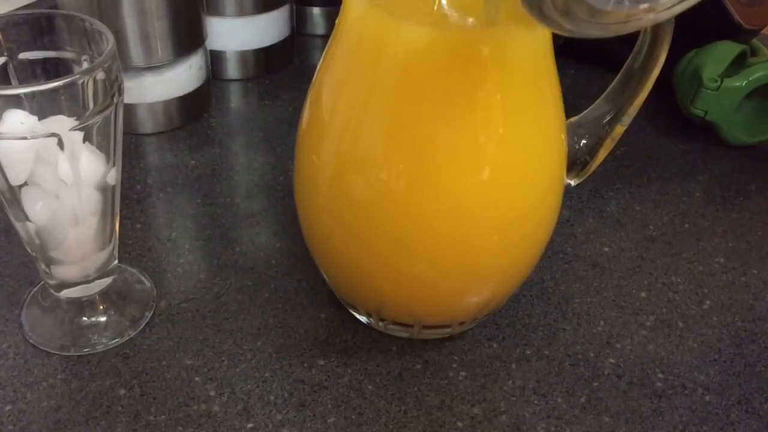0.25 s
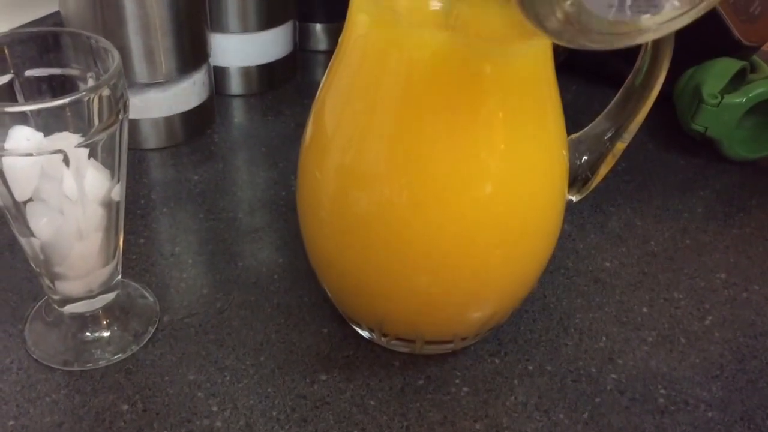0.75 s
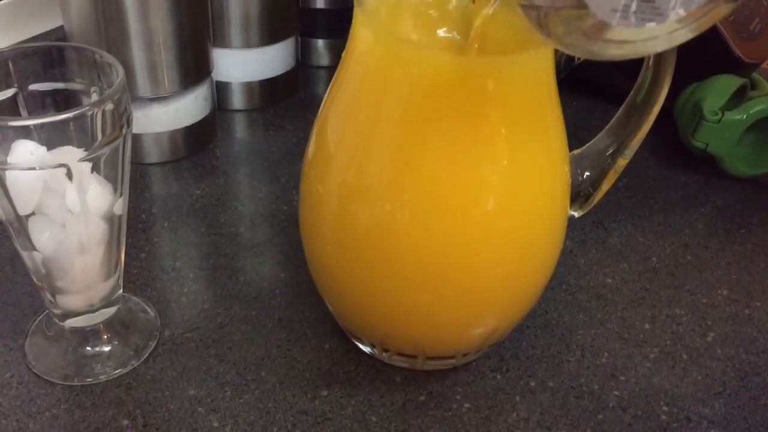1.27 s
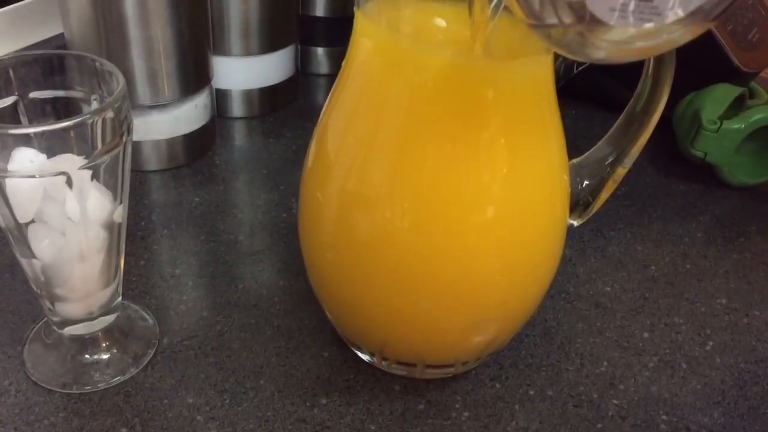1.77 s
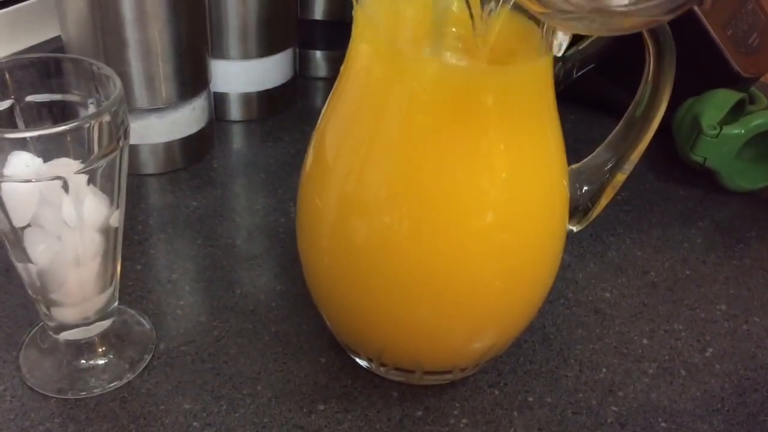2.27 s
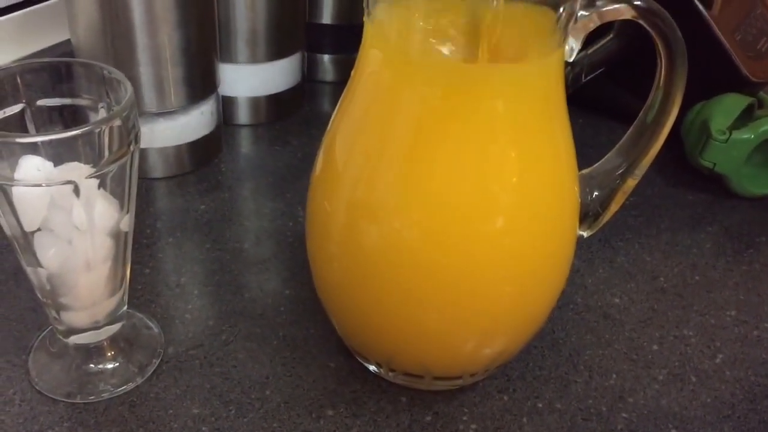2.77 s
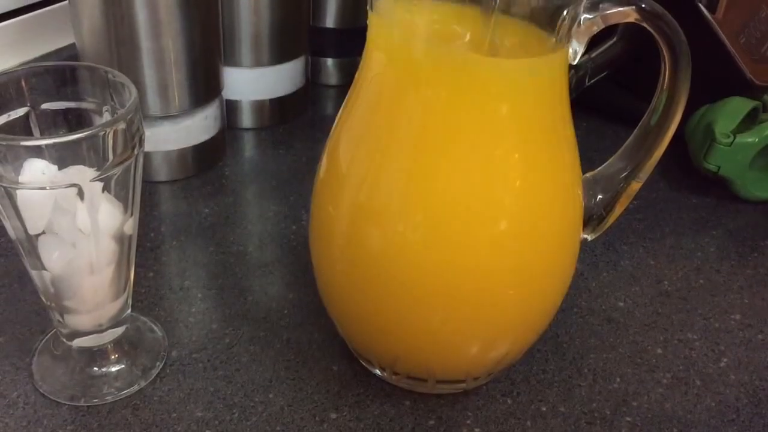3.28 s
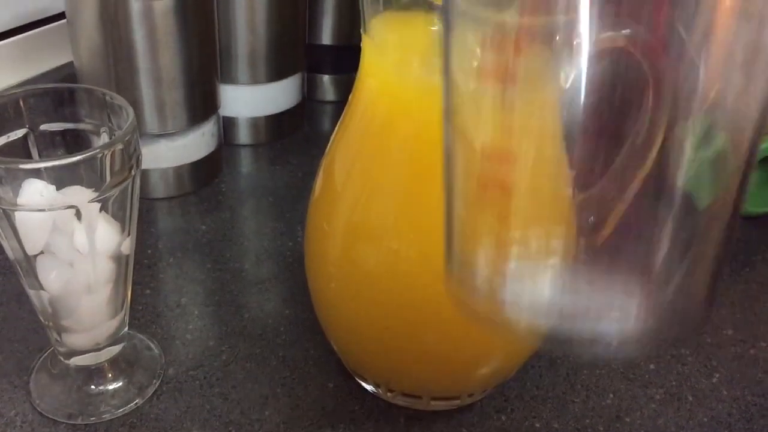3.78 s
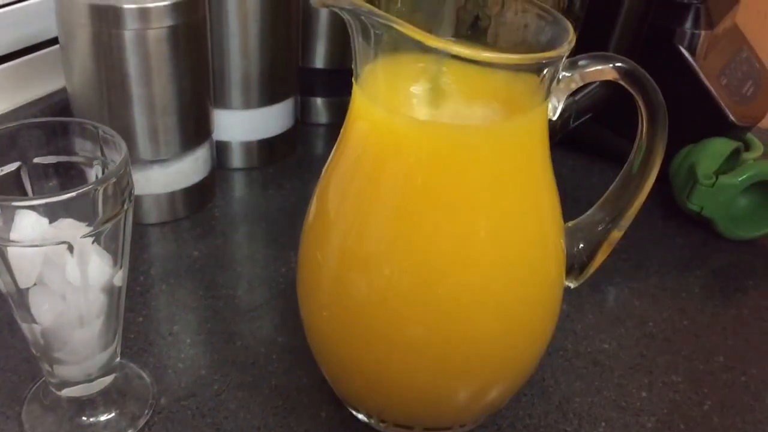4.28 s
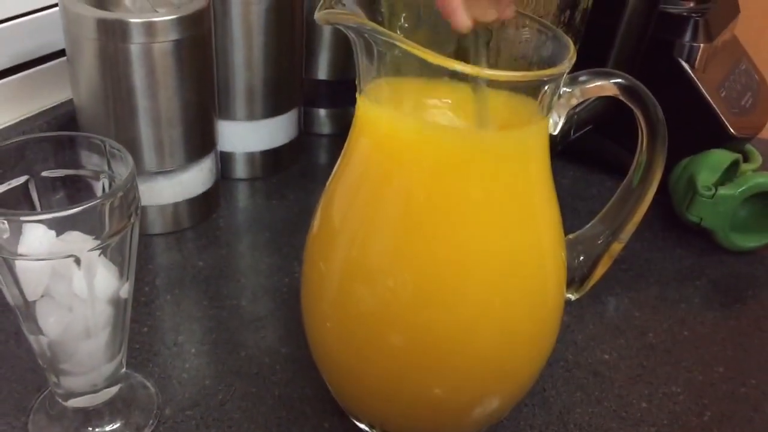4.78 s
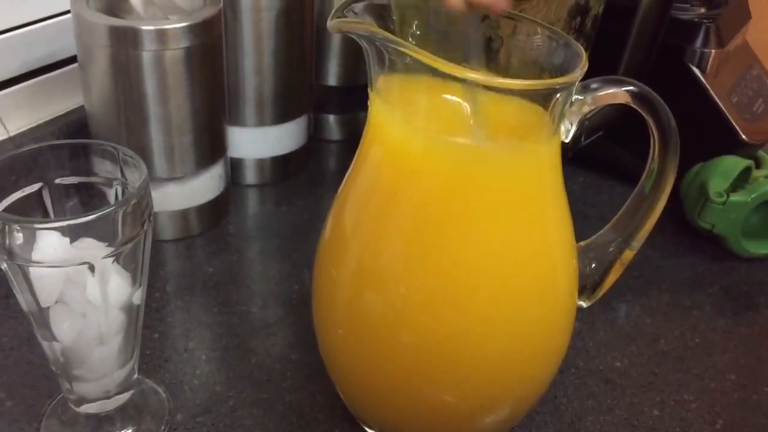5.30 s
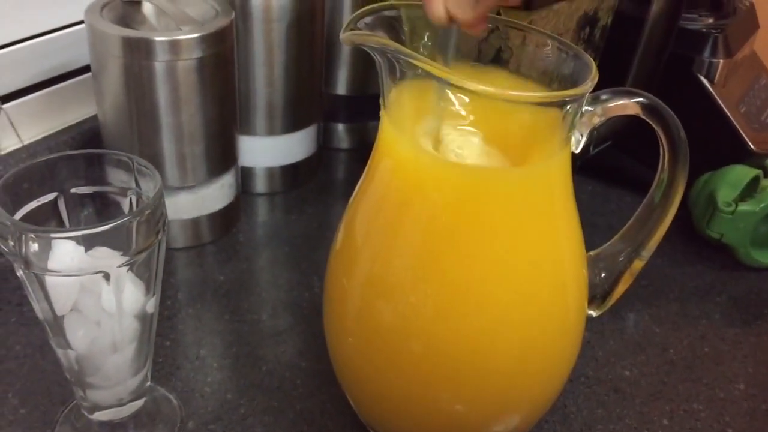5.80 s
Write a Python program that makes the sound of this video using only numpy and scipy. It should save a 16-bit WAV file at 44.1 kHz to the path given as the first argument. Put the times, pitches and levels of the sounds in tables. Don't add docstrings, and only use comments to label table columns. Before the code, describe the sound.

Quick, uneven glass clinks from a stirring spoon ride over wet swirling, bubbles and a light trickle. After about three seconds the clinking stops for a second of plastic ticks and dull bumps. It starts again, and a hard hollow plastic clack, by far the loudest sound, hits close to the microphone, followed by gritty scrapes. Small kitchen, single close microphone, low rumble and soft hiss.

```python
import sys
import numpy as np
from scipy import signal
from scipy.fft import rfft, irfft
from scipy.io import wavfile
from scipy.ndimage import uniform_filter1d

SR = 44100
rng = np.random.default_rng(int(sys.argv[2]) if len(sys.argv) > 2 else 0)


def level_to_linear(level):
    exponent = np.asarray(level, float) / 20
    return 10 ** exponent


def bounce(signal):
    frames = np.transpose(np.atleast_2d(signal))
    limited = np.clip(frames, -1, 1)
    pcm = np.round(limited * 32767).astype(np.int16)
    wavfile.write(sys.argv[1], SR, pcm)


N = 266805
FULL_S = 3.3


def evened(x):
    return x / np.sqrt(np.mean(x ** 2) + 1e-20)


def read(points, hz):
    f, value = np.transpose(points)
    return np.interp(np.log(hz + 1), np.log(f + 1), value)


def curve(rows):
    s, db = np.transpose(rows)
    return level_to_linear(np.interp(np.arange(N) / SR, s, db, left=-120, right=-120))


def add(mix, s, sound):
    part = mix[round(s * SR):][:len(sound)]
    part += sound[:len(part)]


def smoothed_noise(size):
    return evened(uniform_filter1d(rng.standard_normal(N), size=size))


def shaped(spectrum):
    hz = np.fft.rfftfreq(N, 1 / SR)
    return evened(irfft(rfft(rng.standard_normal(N)) * level_to_linear(read(spectrum, hz)), N))


def coloured(spectrum, patchy_db):
    frames, hz = N // 128 + 5, np.fft.rfftfreq(512, 1 / SR)
    a, b, patches = rng.standard_normal((frames, 257, 3)).T
    patches = uniform_filter1d(patches, size=5, axis=0)
    patches = evened(uniform_filter1d(patches, size=8, axis=1))
    z = (a + 1j * b) * level_to_linear(read(spectrum, hz)[:, None] + patchy_db * patches)
    return evened(signal.istft(z, nperseg=512, noverlap=384)[1][:N])


def resonate(x, hz, width):
    r = np.exp(-np.pi * width / SR)
    turn = np.exp(2j * np.pi * min(hz, SR / 2.2) / SR)
    return 2 * signal.lfilter([1 - r], [1, -r * turn], x).real


def swells(events, rise_s, fall_s):
    out, t = np.zeros(N), np.arange(SR // 2) / SR
    hump = (1 - np.exp(-t / rise_s)) ** 2 * np.exp(-t / fall_s)
    for s, db in events:
        add(out, s, level_to_linear(db) * hump / hump.max())
    return out


def crowd(spectrum, level_db, width, count=100):
    hz = np.geomspace(260, 15000, count) * (1 + .03 * rng.standard_normal(count))
    widths = width * (hz / 1000) ** .45
    db = level_db + read(spectrum, hz) + 10 * np.log10(hz / 1000 * widths / width)
    return np.transpose([hz, widths, db])


def struck(modes, edges_hz, groups_db, damping, spread_db, bounce_s, bounce_db, swell, skitter_db, lag_s):
    t = np.float32(np.arange(3000) / SR)
    hz, width, db = np.float32(np.transpose(modes)[:, :, None])
    level_luck, pitch_luck, phase_luck = np.float32(rng.standard_normal((3, len(modes), 1)))
    rings = level_to_linear(db + spread_db * level_luck) * np.exp(-np.pi * damping * width * t)
    rings = rings * np.sin(2 * np.pi * hz * (1 + .008 * pitch_luck) * t + 2 * phase_luck)
    rings[:, :500] *= (1 - np.exp(-t[:500] * np.sqrt(hz * 1000) / swell)) ** 2
    contact = level_to_linear(bounce_db) * rng.standard_normal(len(t)) * np.exp(-t / bounce_s)
    skitter = 9 * rng.uniform(-1, 1, len(t)) * (rng.random(len(t)) < 700 / SR)
    contact += level_to_linear(skitter_db) * uniform_filter1d(skitter, size=9) * np.exp(-t / .024)
    contact[0] = 1
    group, out = np.digitize(hz[:, 0], edges_hz), np.zeros(len(t))
    for k, group_db in enumerate(groups_db):
        part = signal.oaconvolve(rings[group == k].sum(axis=0), contact)[:len(t)]
        late_s = lag_s if k < len(edges_hz) else 0
        add(out, late_s, level_to_linear(group_db) * part / abs(part).max())
    return out * signal.windows.tukey(2 * len(t), .7)[len(t):]


def crackles(table):
    out, t = np.zeros(N), np.arange(4000) / SR
    for s, db, hz, t60_s, share in table:
        grit = rng.standard_normal(len(t)) * level_to_linear(0.773 * rng.exponential(size=len(t)))
        for _ in range(3):
            grit = resonate(grit, hz, share * hz)
        burst = evened(grit) * (1 - np.exp(-t / 0.0006))
        fade_out = np.minimum((t[-1] - t) / .02, 1)
        add(out, s, level_to_linear(db - 3.5 - 60 * t / t60_s) * burst * fade_out)
    return out


# frequency in Hz, level in dB per Hz.
HUSH = [(24, -34), (40, -3.5), (90, -6.5), (141, 3), (317, -11.5), (407, -6), (538, -11.5), (691, -15.5),
        (841, -16.5), (994, -13.5), (2360, -19), (3690, -24), (13300, -30), (15700, -44)]
HUSH_DB = -65


def hush():
    return level_to_linear(HUSH_DB - 4.0) * shaped(HUSH)


# time in seconds, jolt in dB re the blow.
LEAN = [(0, -6.5), (.4, -13), (.9, -7), (1.4, -8), (2.1, -15), (2.7, -8), (4.0, -10), (4.3, -15),
        (4.8, -21), (5.06, -11.5), (5.3, -30), (5.5, -19), (6.05, -8.5)]
# start in seconds, jolt in dB.
GRIPS = [
    (3.17, -59),
    (3.29, -51.5),
    (3.49, -50.5),
]
JOLT_RISE_S, JOLT_FALL_S, JOLT_JUG_DB = 0.00604, 0.02346, -20
MURMUR_DB, LUMPS_DB, LUMP_S = -60.5, 5.0, .05


def rumble():
    low = shaped([(20, -36.5), (45, -13), (78, -4.5), (140, -22.0), (195, -13.0), (300, -17), (600, -77.5)])
    jolts = curve(LEAN) * swells([row[:2] for row in STROKES], JOLT_RISE_S, JOLT_FALL_S)
    jolts += level_to_linear(JOLT_JUG_DB) * swells([row[:2] for row in BUMPS], JOLT_RISE_S, JOLT_FALL_S)
    jolts += swells(GRIPS, JOLT_RISE_S, JOLT_FALL_S)
    jolts += level_to_linear(MURMUR_DB + LUMPS_DB * smoothed_noise(round(LUMP_S * SR)))
    return level_to_linear(-7.5) * jolts * low


# frequency in Hz, level in dB per Hz.
SLOSH = [(120, -58), (200, -49), (404, -44.5), (580, -5), (856, -24), (1020, 0), (1380, -34.5), (1680, -5),
         (1960, -9), (4000, -19.5), (5200, -42), (8800, -120)]


def bubbles():
    out, t = np.zeros(N), np.arange(900) / SR
    for hz in np.geomspace(500, 3200, num=10):
        pops = level_to_linear(4.5 * np.minimum(rng.exponential(size=N), 2.5)) * (rng.random(N) < 28.0 / SR)
        plop = np.sin(2 * np.pi * hz * t * (1 + 8 * t)) * np.exp(-t * hz / 5) * level_to_linear(read(SLOSH, hz))
        out += signal.oaconvolve(pops, plop)[:N]
    return evened(out)


# time in seconds, level in dB.
STIR = [(0, -10), (.7, 0), (1.4, -9.5), (2.0, -8), (2.6, -6), (3.0, -27), (4.1, -18.5), (4.6, -2.5),
        (5.0, -11), (5.4, -7.5), (5.7, -8.5), (6.05, -11.5)]
CHURN_DB, WAKE_DB = -63.5, -53
WAKE_LAG_S, WAKE_RISE_S, WAKE_FALL_S = .035, .02, .03


def swirl():
    slosh = coloured(SLOSH, patchy_db=4.5)
    glass = evened(sum(level_to_linear(db) * resonate(slosh, hz, 2.0 * width) for hz, width, db in PITCHER))
    wet = level_to_linear(-7) * slosh + level_to_linear(-6) * glass + level_to_linear(-0.5) * bubbles()
    wakes = swells([(row[0] + WAKE_LAG_S, WAKE_DB) for row in STROKES], WAKE_RISE_S, WAKE_FALL_S)
    return curve(STIR) * (level_to_linear(CHURN_DB) + wakes) * wet


# time in seconds, level in dB.
POUR = [(0, -64.5), (.3, -73), (.9, -67), (1.14, -77), (1.4, -67.5), (1.8, -73.5), (1.92, -65.5),
        (2.07, -77), (2.5, -76), (3.0, -77.5), (3.4, -78), (4.3, -86.5), (4.6, -67.5), (4.85, -68),
        (5.1, -95), (5.25, -56.5), (5.46, -79), (6.05, -81.5)]


def pour():
    fizz = coloured([(2000, -7), (3800, -5.5), (6500, -5), (9000, -13.5), (15000, -13.5)], patchy_db=3.5)
    return curve(POUR) * evened(fizz * level_to_linear(3.1 * smoothed_noise(120)))


# frequency in Hz, width in Hz, level in dB.
PITCHER = [(474, 77, 11.5), (622, 23, -5.5), (731.6, 26, -2), (1000, 130, -4), (1012.3, 58.5, 6),
           (1173, 31, -9), (1346, 62.4, -3.5), (1661, 85, -4), (1883, 90, -2.5), (2201.6, 42, -9),
           (2352, 178, 3), (2700, 190, -45), (3715, 35, -21.5), (1005, 26, -8.5), (1812, 95, -6.5),
           (2452, 36, -7)]
RING_EDGES_HZ = [600, 850, 1400, 2100, 3000]
RING_SHARES_DB = [-3.5, -1.8, 0, -4.5, -3.5, 0]
# frequency in Hz, level in dB per Hz.
CLACK = [(150, -61), (250, -17), (984, 0.5), (1360, -10.5), (2400, -4), (2900, -10.5), (5750, -18.5),
         (7300, -31), (13100, -48.5), (15000, -65)]
# time in seconds, frequency in Hz.
NECK = [(0, 990), (.3, 940), (.68, 935), (.75, 990), (.9, 940), (1.1, 1000), (2.2, 1005), (2.45, 1040),
        (3.0, 1050), (4.0, 1010), (6.05, 1015)]
NECK_REST_HZ = 1010
# start in seconds, blow in dB,
# shoulder ring in dB re the blow, damping factor, belly ring in dB re the usual.
STROKES = [(0.074, -35.5, -6.5, 2.4, 0), (0.269, -30.5, -1, 5.52, 0), (0.499, -32.5, 4, 4.1, -1),
           (0.685, -33, -9, 3, 0), (0.72, -27, -5, 2.6, 1), (0.923, -28, -2, 2.3, 1),
           (1.13, -25, -5.5, 3.6, 0), (1.354, -33, 2.5, 3, 0), (1.577, -38.5, 0, 1.8, -1),
           (1.764, -32, 3.5, 2, 1), (1.99, -31.5, 1.5, 2.4, 0), (2.206, -31.5, 0, 2.9, 2),
           (2.427, -34, -2, 2.3, 1.5), (2.66, -40, 5.5, 2.6, -2), (2.816, -42, -22, 1.45, 0),
           (3.959, -34.5, -9.5, 2.2, 2), (4.15, -32, 5, 3.4, 2), (4.255, -31.5, -3.5, 4.5, -2),
           (4.378, -33, 3, 3.6, 1), (4.594, -30.5, 5, 2.7, 0), (4.818, -26.5, 1.5, 2, 0),
           (5.053, -28.5, 2, 2.2, -2.5), (5.279, -22.5, -1, 3.36, -5), (5.4997, -23.5, 1.5, 2.8, -1.5),
           (5.717, -30.5, 1.5, 2.8, 3), (5.925, -27.5, -6.5, 3.51, 1), (6.022, -39.5, 3.5, 3.5, -2)]
# start in seconds, blow in dB, shoulder ring in dB re the blow, damping factor.
GRAZES = [(.19, -62, -8, 1.5), (.22, -65, -8, 1.5), (.48, -58, -4, 1.5), (.912, -46, 3, 1.5),
          (1.561, -56, 3, 1.5), (1.759, -52, 6, 1.5), (1.964, -52, -2, 1.2), (2.576, -54, -10, 1),
          (2.62, -60, -12, .8), (2.788, -63, -12, 1), (5.553, -48, -8, 1.5), (5.748, -46, -2, 2),
          (5.97, -46, -4, 2), (0.017, -52.5, -9, 1.64), (0.405, -54.5, 0, 0.76), (0.448, -62, -22, 0.81),
          (0.549, -71, 0, 1.5), (0.584, -47.5, -9, 1.96), (0.654, -50.5, -12.5, 1.2), (0.792, -45, -6, 1),
          (0.856, -69.5, -17, 0.72), (0.899, -41.5, -6, 0.65), (1.006, -42.5, -15, 1.6),
          (1.106, -43, -13, 1), (1.212, -48, 0.5, 1.7), (1.313, -48.5, -2, 1.05), (1.451, -57.5, 2, 0.21),
          (1.511, -48.5, -9, 3.9), (1.719, -55, 5, 0.305), (1.926, -54, 0.5, 1.7), (1.939, -49, 1, 0.133),
          (2.159, -50, -8, 0.47), (2.389, -49, -10, 1.18), (2.476, -42, -6, 1.03),
          (2.567, -49.5, -16, 0.35), (2.86, -55, -1, 0.57), (4.922, -42.5, -2, 1.7), (5.094, -41.5, 1, 2.2),
          (5.157, -48, -2, 2.86)]
BELLY_FILLING_DB, BELLY_FULL_DB, BELLY_GRAZED_DB = -7.5, -9.5, -7
TICK_DB, TICK_GRAZED_DB, TICK_FOLLOWS_SHOULDER = -8.0, -7.5, 0.69
SKITTER_FILLING_DB, SKITTER_FULL_DB, BOUNCE_FILLING_DB, BOUNCE_FULL_DB = -18.5, -27, -15, -20
SPOON_LAG_S = .0009


def spoon():
    out, t = np.zeros(N), np.arange(8000) / SR
    thud = np.sin(2 * np.pi * 76 * t) + .6 * np.sin(2 * np.pi * 190 * t)
    thud *= (1 - np.exp(-t / .008)) ** 2 * np.exp(-t / .025)
    modes = np.vstack([PITCHER, crowd(CLACK, level_db=0, width=130.0)])
    neck = np.digitize(modes[:, 0], RING_EDGES_HZ) == 2
    for s, db, shoulder_db, damping, *own_belly_db in STROKES + GRAZES:
        grazed = not own_belly_db
        filling = s < FULL_S
        belly_db = BELLY_FILLING_DB if filling else BELLY_FULL_DB
        belly_db += grazed * BELLY_GRAZED_DB + sum(own_belly_db)
        tick_db = TICK_DB + grazed * TICK_GRAZED_DB + TICK_FOLLOWS_SHOULDER * shoulder_db
        own_db = [belly_db, belly_db, 0, shoulder_db, shoulder_db, tick_db]
        tuned = modes.copy()
        tuned[neck, 0] *= np.interp(s, *np.transpose(NECK)) / NECK_REST_HZ
        knock = struck(tuned, RING_EDGES_HZ, db + np.add(RING_SHARES_DB, own_db), damping, spread_db=2.16,
                       bounce_s=0.0051, bounce_db=BOUNCE_FILLING_DB if filling else BOUNCE_FULL_DB, swell=1.075,
                       skitter_db=SKITTER_FILLING_DB if filling else SKITTER_FULL_DB, lag_s=SPOON_LAG_S)
        add(out, s, knock)
        add(out, s, level_to_linear(db - 33.0) * thud)
    return out


# start in seconds, peak in dB, centre in Hz, t60 in seconds,
# width as share of centre.
TICKS = [(.0228, -56, 11800, .04, .4), (.0667, -52, 6500, .04, .5), (.1351, -55, 5550, .05, .5),
         (.3157, -54, 5600, .04, .5), (.4703, -56, 12800, .05, .3), (.9088, -46, 4000, .04, .5),
         (.9138, -48, 6020, .03, .6), (.978, -50, 3600, .08, .2), (1.1104, -54, 6890, .04, .6),
         (1.2655, -60, 8800, .03, .2), (1.38, -56, 8800, .06, .15), (1.45, -57, 3500, .05, .6),
         (1.68, -60, 8800, .06, .15), (2.034, -52, 3600, .03, .3), (2.094, -60, 6000, .05, .3),
         (2.41, -56, 6800, .05, .2), (2.415, -54, 3900, .06, .2), (2.474, -55, 4500, .06, .2),
         (2.51, -56, 5800, .04, .3), (2.538, -57, 6300, .04, .2), (0.1076, -53, 6130, 0.119, 1),
         (0.1782, -54.5, 4600, 0.061, 0.46), (0.5506, -42, 4910, 0.0626, 0.86),
         (1.3149, -41, 4370, 0.053, 1), (1.335, -52, 3710, 0.29, 0.183), (1.472, -51, 11870, 0.044, 0.31),
         (1.5045, -47, 4100, 0.081, 0.78), (1.722, -45.5, 12600, 0.116, 0.252),
         (1.7464, -49, 2700, 0.18, 1), (1.8844, -45, 5020, 0.062, 1), (1.9357, -54.5, 6840, 0.22, 0.96),
         (2.081, -58.5, 4830, 0.107, 0.46), (2.39, -57.5, 3580, 0.9, 1), (2.5063, -49, 2700, 0.199, 0.81),
         (2.5704, -52, 4040, 0.08, 1), (2.8694, -60.5, 3020, 0.24, 0.3), (3.0233, -57.5, 5550, 0.091, 0.97),
         (3.035, -36.5, 5300, 0.043, 0.79), (3.254, -46, 5500, 0.036, 0.444),
         (3.3954, -59, 5740, 0.227, 0.6), (3.4394, -56.5, 5500, 0.18, 0.95), (3.458, -42.5, 5950, 0.079, 1),
         (3.6734, -48.5, 2940, 0.18, 1), (3.6874, -34, 6460, 0.0397, 1)]


def drops_and_fingers():
    return crackles(TICKS)


# start in seconds, peak in
# dB.
SPRAYS = [(.08, -52), (0.301, -49.5), (.49, -54), (.94, -52), (1.329, -50), (1.37, -51.5), (1.895, -46.5),
          (2.411, -63.5), (3.46, -47), (3.69, -43.5), (4.596, -52), (4.82, -56), (5.28, -50), (5.5, -61),
          (5.718, -56), (5.927, -55), (6.043, -52)]
SPRAY_HZ, SPRAY_T60_S, SPRAY_SHARE = 11300, 0.048, 1


def sprays():
    return crackles([(s, db, SPRAY_HZ, SPRAY_T60_S, SPRAY_SHARE) for s, db in SPRAYS])


# start in
# seconds, peak in dB, centre in Hz, t60 in seconds, # width as share of centre.
BUMPS = [(3.027, -48.5, 1090, 0.088, 0.57), (3.037, -37, 520, 0.03, 1), (3.038, -33, 2300, 0.03, 0.4),
         (3.424, -55.5, 2003, 0.14, 0.11), (3.437, -56, 2410, 0.22, 0.46),
         (3.458, -41.5, 1140, 0.033, 0.13), (3.654, -62.5, 2700, .1, .3), (3.682, -35.5, 1970, 0.11, 0.61),
         (3.683, -41, 850, 0.163, 1), (3.685, -34.5, 194, 0.05, 0.41), (5.619, -35, 285, 0.048, 0.374),
         (.27, -45, 702, 0.11, .2), (.97, -55, 2460, 0.22, 1), (1.474, -45.5, 1720, 0.093, 0.108),
         (1.51, -47, 1710, 0.101, 0.087), (3.96, -40.5, 650, 0.13, .25), (5.72, -33.5, 406, 0.093, 0.75),
         (.855, -50, 1180, .06, .12), (.665, -52, 1720, .05, .15), (5.59, -44, 285, .05, .3),
         (5.725, -36, 1480, .1, .15), (5.927, -38, 1480, .08, .2), (5.501, -25, 1800, .03, .25),
         (2.44, -46, 560, .12, .3), (2.67, -51, 540, .1, .3), (.51, -44, 430, .1, .3),
         (5.465, -54, 1050, .04, .15)]


def bumps():
    return level_to_linear(2.5) * crackles(BUMPS)


# level in dB re the blow, centre in Hz, t60 in seconds, width as share of centre.
BRUSH = (-20.0, 2600.5, 0.02, 0.3)
BRUSH_LEAD_S = .009


def brushes():
    return crackles([(s - BRUSH_LEAD_S, db + BRUSH[0], *BRUSH[1:]) for s, db, *_ in STROKES if s > FULL_S])


# start in seconds, peak in dB, hollow body in dB re the peak,
# rattle in dB re clear ring, damping factor.
JUG_HITS = [
    (4.4918, -8.5, -3, -13, 2.2),
    (4.5163, -18, -.5, -13, 1.9),
    (6.0424, -27, 8.5, -10, 0.87),
]
# frequency in Hz, width in Hz, level in dB.
JUG = [(187, 14, -12), (372.9, 15, -3), (436, 26.5, 2), (557, 66, -1.5), (640, 35, -3), (735, 24, -1),
       (1468, 45, -5), (2200, 60, 6), (2095, 22, 2), (3750, 100, -17), (4118, 68, -27), (4205, 56, -11),
       (5020, 70, -39), (5730, 75, -12), (7730, 47, -33.5)]
JUG_EDGES_HZ = [1000, 3000]
# frequency in Hz, level in dB per Hz.
PLASTIC = [(71, -41), (120, -31.5), (412, 20.5), (1800, -1), (2110, -12), (3100, -40), (4120, -18),
           (5700, -18), (15000, -30.5)]
JUG_EDGE_DB, JUG_EDGE_SOFTER, JUG_LAG_S = -4.5, 0.1, .0004


def jug():
    out = np.zeros(N)
    for s, db, body_db, rattle_db, damping in JUG_HITS:
        modes = np.vstack([JUG, crowd(PLASTIC, rattle_db, width=160.0)])
        edge_db = JUG_EDGE_DB + JUG_EDGE_SOFTER * (db - JUG_HITS[0][1])
        hit = struck(modes, JUG_EDGES_HZ, db + np.array([body_db, 0, edge_db]), damping, spread_db=.5,
                     bounce_s=.0018, bounce_db=-27, swell=1.0, skitter_db=-38, lag_s=JUG_LAG_S)
        add(out, s, hit)
    return out


# time in seconds, scrape in dB.
SLIDES = [
    [(4.54, -51), (4.59, -52), (4.74, -55.5), (4.89, -61), (4.95, -78)],
    [(5.1, -76), (5.16, -54.5), (5.228, -48.5), (5.414, -54.5), (5.46, -92)],
]
# frequency in Hz, width in Hz, level in dB.
SCRAPE = [(367, 54, 13.5), (745, 43, 6), (2139, 41, -2), (2274, 31, 8), (4120, 45, 1.5), (5437, 75, 0.5),
          (6840, 48, -22.5), (7970, 56, -70), (8460, 70, -8.5), (10000, 62, -75), (11350, 130, -20),
          (13100, 61, -10), (15200, 62, -19)]
# frequency in Hz, level in dB per Hz.
SCRAPE_BED = [(120, -33), (200, -1), (365, -11), (1070, -8.5), (1600, -17.5), (2220, -15.5), (3080, -41.5),
              (5520, -17), (6160, -22.5), (15600, -40)]


def slides():
    grit = rng.standard_normal(N) * level_to_linear(1.5 * rng.exponential(size=N))
    grit = grit * level_to_linear(2.5 * smoothed_noise(200))
    wander = rng.standard_normal((len(SCRAPE), N // 64 + 1))
    flares = level_to_linear(3.5 * evened(uniform_filter1d(wander, size=10))).repeat(64, axis=1)[:, :N]
    sung = np.zeros(N)
    for (hz, width, db), flare in zip(SCRAPE, flares):
        wide = 2.8 * width + hz / 32
        sung += level_to_linear(db) * flare * resonate(resonate(grit, hz, wide), hz, wide)
    bed = coloured(SCRAPE_BED, patchy_db=2.5)
    return sum(curve(rows) for rows in SLIDES) * (level_to_linear(-.4) * evened(sung) + level_to_linear(-6) * bed)


# frequency in Hz, t60 in seconds.
KITCHEN = [(100, 0.43), (300, 0.208), (1000, 0.16), (3000, 0.23), (8000, 0.17), (15000, 0.24)]


def kitchen(x):
    taps = np.zeros((3, SR // 2))
    slots = np.arange(120, SR // 2 - 20, 20)
    at = slots + rng.integers(0, 20, (3, len(slots)))
    np.put_along_axis(taps, at, rng.choice([-1., 1.], at.shape), 1)
    hz, t, z = signal.stft(taps, SR, nperseg=256)
    tails = signal.istft(z * level_to_linear(-60 * t / read(KITCHEN, hz)[:, None]), SR, nperseg=256)[1]
    tails = tails / np.linalg.norm(tails[0])
    phase = 1.3 * np.arange(N) / SR + np.arange(3)[:, None] / 3
    turns = np.sqrt(2 / 3) * np.cos(2 * np.pi * phase)
    return signal.fftconvolve(x * turns, tails, axes=1)[:, :N].sum(axis=0)


def scene():
    near = level_to_linear(5.5) * spoon() + drops_and_fingers() + sprays() + bumps() + brushes()
    closest = jug()
    echoes = level_to_linear(-9.0) * kitchen(near + closest / 2)
    return (hush() + rumble() + swirl() + pour() + near + closest + slides() + echoes)[None]


def top_cut(x):
    return signal.sosfilt(signal.butter(12, 15600, fs=SR, output="sos"), x)


def record(dry):
    limited = signal.oaconvolve(dry, signal.firwin(511, 15750, fs=SR)[None], "same")
    return top_cut(limited)


dry = scene()
out = record(dry)
bounce(out)
```